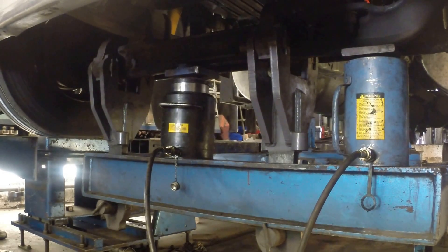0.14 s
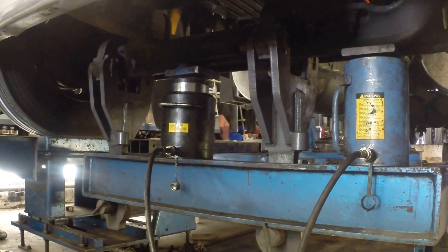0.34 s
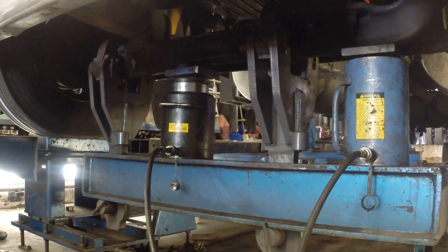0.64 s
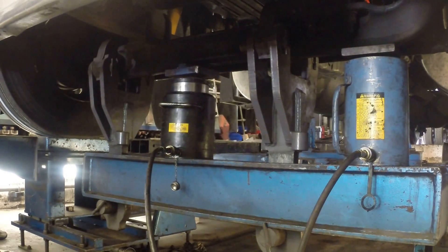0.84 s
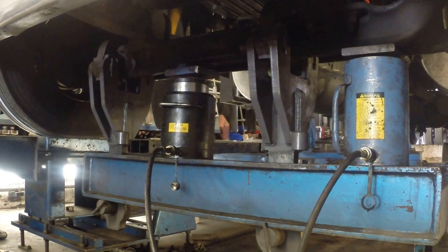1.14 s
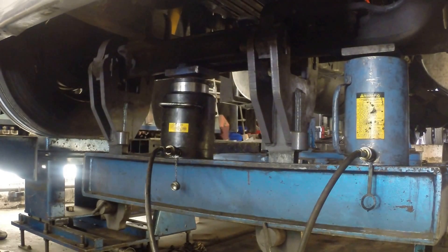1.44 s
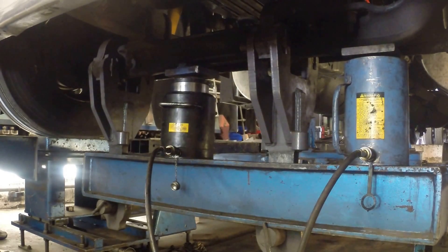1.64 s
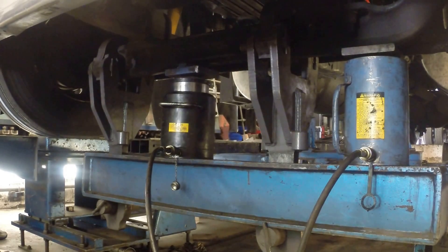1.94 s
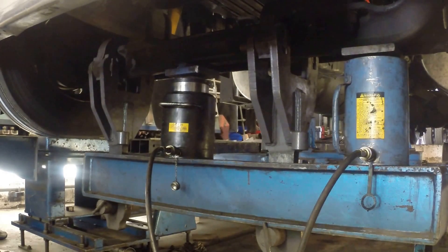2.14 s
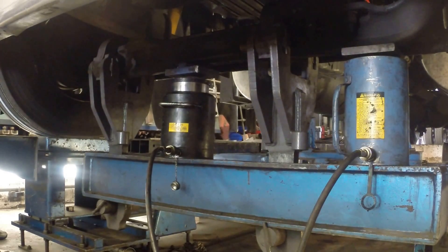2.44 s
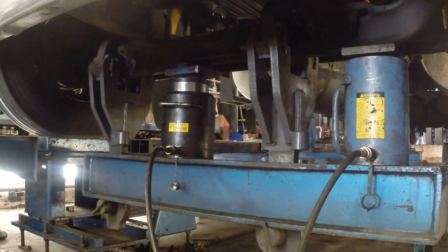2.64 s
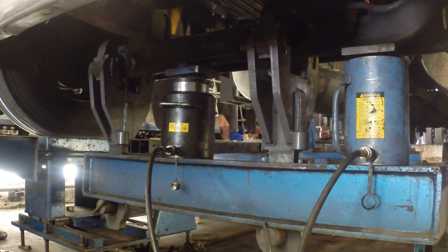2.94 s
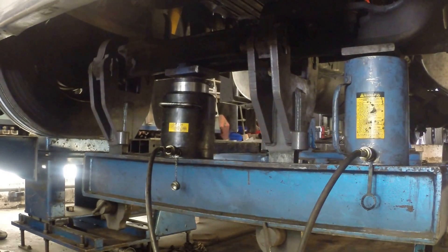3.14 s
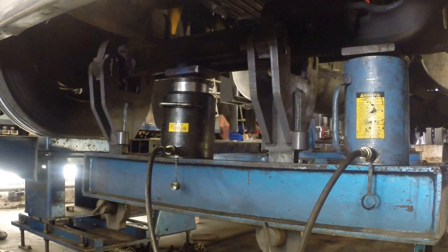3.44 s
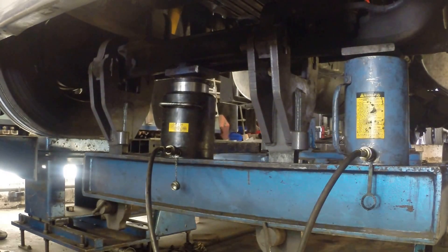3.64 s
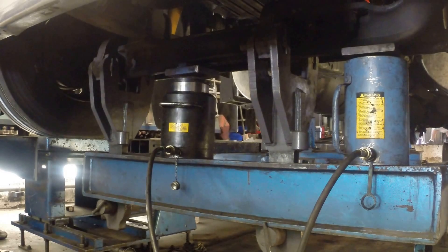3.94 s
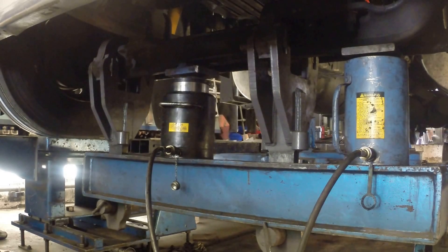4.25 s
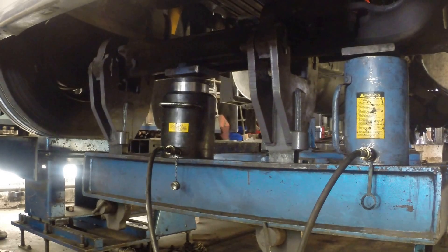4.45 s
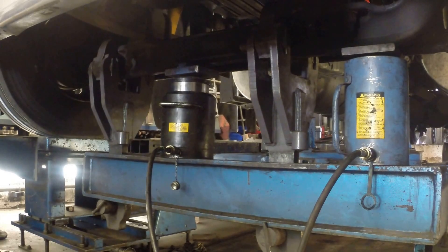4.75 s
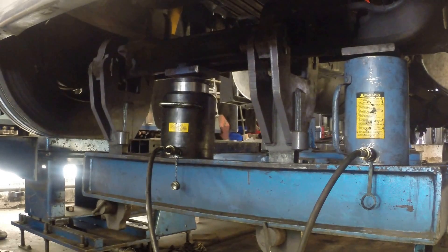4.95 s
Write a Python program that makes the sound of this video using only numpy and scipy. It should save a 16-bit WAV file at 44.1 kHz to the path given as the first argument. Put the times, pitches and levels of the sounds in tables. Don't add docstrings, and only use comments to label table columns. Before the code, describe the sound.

Shrill, rough hydraulic pump noise strains under load in an echoing hall, winds down abruptly, ticks faintly, and gives way to quiet shop hum.

```python
import sys
import numpy as np
from scipy import signal
from scipy.fft import rfft, irfft
from scipy.io import wavfile

SR = 44100
rng = np.random.default_rng(int(sys.argv[2]) if len(sys.argv) > 2 else 0)


def pcm_store(signal):
    levels = np.round(np.clip(np.atleast_2d(signal), -1, 1) * 32767)
    wavfile.write(sys.argv[1], SR, levels.astype(np.int16).T)


def attenuation_scalar(level_db):
    decades = np.asarray(level_db, float) / 20
    return 10 ** decades


N = 224406

SWITCH_OFF_S = 2.32
STROKES_PER_TURN = 1.62

# start_s, speed_turns_per_s
SPEED = [
    (0, 160.3),
    (.5, 158.64),
    (1, 156.9),
    (1.5, 155.08),
    (2, 153.65),
    (2.32, 152.4),
]
LOADED_SPEED = SPEED[-1][1]


def shaft():
    braking, easing = 520, 200
    coasted_s = np.clip(np.arange(N) / SR - SWITCH_OFF_S, 0, None)
    lost = braking * coasted_s - easing * np.minimum(coasted_s, .5) ** 2
    return np.maximum(in_time(SPEED)[0] - lost, 0)


# multiple of shaft speed, level_db (rms)
STRONG = [(12, -27.3), (16, -30.4), (20, -30.6), (30, -37), (40, -44)]
# multiple of shaft speed, level_db (rms)
WEAK = [(1, -51), (2, -58.5), (3, -34.5), (4, -43), (10, -38), (18, -72), (19, -49), (22, -46), (24, -45),
        (29, -57), (32, -49), (34, -57), (36, -44), (37, -64), (38, -55), (39, -60), (41, -70), (42, -50),
        (48, -57.5), (50, -56), (51, -56), (55, -59), (57, -58), (58, -80), (60, -62.5), (72, -69)]
# multiple of shaft speed, strokes added, level_db (rms)
SPLIT = [(12.47, 1, -45), (13.13, 0.94, -37.5), (19.5, -0.7, -49.5), (18.6, 0.93, -74), (31, 0.52, -62.5),
         (36.95, -0.63, -67.5), (41.9, -0.49, -56)]
MAINS_SIDE_DB = (-41.5, -35)


def powered_whine(turns, angle):
    t = np.arange(N) / SR
    out = np.zeros(N)
    for k, db in STRONG:
        k = round(k)
        out += attenuation_scalar(db + standing_db(k * turns)) * np.sin(k * angle)
    mains_pulse_hz = 120
    for side, db in zip((-1, 1), MAINS_SIDE_DB):
        out += attenuation_scalar(db + drift(1.1)) * np.sin(16 * angle + side * 2 * np.pi * mains_pulse_hz * t)
    split = [(k + strokes * STROKES_PER_TURN, db) for k, strokes, db in SPLIT]
    for k, db in WEAK + split:
        waver_db = .6 * np.log(k) * drift(2.5)
        start_angle = rng.uniform(0, 2 * np.pi)
        out += attenuation_scalar(db + waver_db + standing_db(k * turns)) * np.sin(k * angle + start_angle)
    return out


# pitch_hz, width_hz, level_db
STANDING = [(313.5, 15, 22), (1524, 22, 8), (1564, 6, -8), (1829.5, 3, -12), (1865, 12, -3), (1897, 68, 9),
            (2546, 32, 7), (3066.4, 12, -9.5), (3071, 54, 12), (3175, 60, 3), (3138, 4, -8),
            (3152, 4.3, -20), (3181, 6.2, -20), (4696, 44, 3.6), (4733, 4, -15), (4794, 5, -15),
            (6142, 92, 11.4), (6208, 5, -13), (6336, 135, 13.7), (6380, 35, -11), (7640, 60, 9),
            (9240, 120, 7), (11100, 150, 7)]


def standing_db(hz):
    coarse = sum(db / (1 + (2 * (hz[::64] - centre_hz) / width_hz) ** 2)
                 for centre_hz, width_hz, db in STANDING)
    return np.interp(np.arange(N) / 64, np.arange(len(coarse)), coarse)


# multiple of shaft speed, level_db (rms)
COAST = [(10, -34), (12, -27.5), (14, -42), (16, -40), (18, -43), (20, -33.5), (24, -43), (30, -39),
         (32, -42), (36, -41), (40, -43), (50, -47)]
# pitch_hz, width_hz, level_db
PANELS = [(598, 18, 10.5), (900, 60, 12), (1160, 70, 6), (1520, 110, 5), (1760, 110, 5), (2290, 60, 11),
          (2800, 120, 10), (4100, 200, 5), (5000, 200, 6), (5500, 250, 6)]


def coasting_whine(turns, angle, powered):
    speed = turns / LOADED_SPEED
    tones = np.zeros(N)
    for k, db in COAST:
        tones += speed ** (k / 17) * attenuation_scalar(db + (k / 7) * drift(60)) * np.sin(k * angle)
    turning = np.clip((turns - 36) / 10, 0, 1)
    tones = tones * (1 - powered) * turning
    return .4 * tones + resonances(tones, PANELS)


def whine(turns):
    angle = 2 * np.pi * np.cumsum(turns) / SR
    powered = np.clip((SWITCH_OFF_S - np.arange(N) / SR) / .01 + 1.5, 0, 1)
    running = powered * powered_whine(turns, angle)
    return np.sqrt(2) * (running + coasting_whine(turns, angle, powered))


# pitch_hz, width_hz, level_db
CASING = [(597, 12, 2), (675, 20, 2), (725, 16, -1), (810, 24, 1), (863, 20, 1), (945, 50, 0),
          (1187, 50, -6), (466, 60, -14), (1050, 120, -6), (1527, 90, -10), (2180, 40, -10),
          (2300, 120, -10), (2850, 120, -18), (4700, 300, -22), (5400, 250, -24), (6300, 500, -22)]
# pitch_hz, level_db (per Hz)
RUMBLE = [(88, -42), (150, -19.5), (371, -10.5), (465, -7), (530, -7), (919, 2), (1400, -16.5), (1820, -78),
          (3080, -120)]
# pitch_hz, level_db (per Hz)
OIL = [(710, -38), (1200, 0.5), (1310, -6), (1650, -9), (2240, -8), (2520, -19), (3140, -8.5), (3840, -19),
       (4600, -16), (5620, -22.5), (6520, -14), (7170, -27), (9750, -38), (10800, -32.5), (15000, -80)]
# time_s, level_db
SHUDDERS = [
    (2.305, 2.5),
    (2.395, 1.5),
    (2.46, 1.3),
]


def roar(turns):
    casing_db, rumble_db, oil_db = -20, -4.5, -26.5
    shudder_s = 0.013
    t = np.arange(N) / SR
    speed = np.minimum(turns / LOADED_SPEED, 1)
    jolt_db = sum(db * np.exp(-((t - s) / shudder_s) ** 2) for s, db in SHUDDERS)
    strokes_per_s = turns * STROKES_PER_TURN * (1 + 0.0384 * drift(22.4))
    stroke = np.cos(2 * np.pi * np.cumsum(strokes_per_s) / SR)
    knock_db = 2.0 * stroke + 0.55 * drift(39) + 2.3 * drift(10.4)
    knocks = attenuation_scalar(knock_db) * rng.standard_normal(N)
    body = attenuation_scalar(-4.5) * rms_one(resonances(knocks, CASING))
    body = body + attenuation_scalar(rumble_db) * speed * coloured(RUMBLE)
    oil = attenuation_scalar(1.7 * stroke) * coloured(OIL)
    pump = attenuation_scalar(casing_db + jolt_db) * speed ** 0.9 * body + attenuation_scalar(oil_db) * speed ** 0.9 * oil
    duller = signal.sosfilt(signal.butter(2, 7000, fs=SR, output="sos"), pump)
    return speed ** 2 * pump + (1 - speed ** 2) * duller


# time_s, level_db (peak), pitch_hz
TICKS = [
    (2.6194, -47, 5330),
    (2.6708, -37, 5700),
    (2.7591, -39, 6530),
]


def valve():
    out = np.zeros(N)
    t = np.arange(SR // 20) / SR
    decay_db = -60 * t / .008
    for s, db, hz in TICKS:
        ring = attenuation_scalar(decay_db) * np.sin(2 * np.pi * hz * t)
        crack = resonate(rng.standard_normal(len(t)), 10500, 4000) * attenuation_scalar(-13 + decay_db)
        out[round(s * SR):][:len(t)] += attenuation_scalar(db) * (ring + crack)
    return out


# delay_s, level_db
WALLS = [
    (.045, -17),
    (.14, -15),
]


def wall_echoes(tones):
    echoes = np.zeros(N)
    for s, db in WALLS:
        echoes += attenuation_scalar(db) * np.pad(tones, (round(s * SR), 0), mode="reflect")[:N]
    return signal.sosfilt(signal.butter(2, 1500, "high", fs=SR, output="sos"), echoes)


# pitch_hz, fade_s
HALL_T60 = [(200, 1.83), (1000, 0.28), (4000, 1.28), (9000, 0.98), (14000, 0.32)]


def hall(x):
    t, tail = np.arange(SR) / SR, 0
    for hz in 90 * 2. ** np.arange(8):
        octave = signal.butter(2, [hz / 2 ** .5, hz * 2 ** .5], "band", fs=SR, output="sos")
        noise = signal.sosfilt(octave, rng.standard_normal(SR))
        tail = tail + noise * attenuation_scalar(-60 * t / at_hz(HALL_T60, hz))
    return signal.fftconvolve(x, tail / np.sqrt(np.sum(tail ** 2)))[:N]


# pitch_hz, level_db (per Hz)
SHOP = [(12, -48.5), (20, -25), (32, -10), (69, -4), (128, -5.5), (170, -16), (216, -4.5), (296, -13),
        (331, -8.5), (391, -12), (430, -13.5), (647, -12), (1050, -8), (1700, -26), (2210, -45),
        (3740, -120)]
# pitch_hz, level_db (per Hz)
AIR = [(880, -28), (1500, -21), (1830, -0.5), (2120, -1), (2730, -6.5), (3410, -3), (6090, -15.5),
       (8140, -17), (10800, -31), (14000, -38)]


def shop():
    hum = attenuation_scalar(-36.5 + 0.18 * drift(0.53)) * coloured(SHOP)
    return hum + attenuation_scalar(-52) * coloured(AIR)


def insects():
    pitch_hz, width_hz, level_db = 8000, 1500, -72
    throbs_per_s, throb_start_s = 7.8, 0.044
    throb = np.cos(2 * np.pi * throbs_per_s * (np.arange(N) / SR - throb_start_s))
    chorus = resonate(rng.standard_normal(N), pitch_hz, width_hz)
    chorus = resonate(chorus, pitch_hz, width_hz)
    return attenuation_scalar(level_db + 7.0 * throb) * rms_one(chorus)


def rms_one(x):
    return x / np.sqrt(np.mean(x ** 2) + 1e-20)


def in_time(rows):
    s, *columns = np.transpose(rows)
    return [np.interp(np.arange(N) / SR, s, c) for c in columns]


def at_hz(points, hz):
    point_hz, value = np.transpose(points)
    return np.interp(np.log(hz), np.log(point_hz), value)


def drift(rate_hz):
    r = np.exp(-80 * np.pi * rate_hz / SR)
    slow = signal.lfilter([1], [1, -2 * r, r * r], rng.standard_normal(N // 40 + 2002))
    slow = slow[2000:]
    return np.interp(np.arange(N) / 40, np.arange(len(slow)), rms_one(slow))


def resonate(x, hz, width_hz):
    r = np.exp(-np.pi * width_hz / SR)
    feedback = [1, -2 * r * np.cos(2 * np.pi * hz / SR), r * r]
    return signal.lfilter(np.array([1, 0, -1]) * (1 - r * r) / 2, feedback, x)


def resonances(x, modes):
    return sum((-1) ** k * attenuation_scalar(db) * resonate(x, hz, width_hz)
               for k, (hz, width_hz, db) in enumerate(modes))


def coloured(spectrum):
    hz = np.maximum(np.fft.rfftfreq(N, 1 / SR), 1)
    return rms_one(irfft(rfft(rng.standard_normal(N)) * attenuation_scalar(at_hz(spectrum, hz)), N))


def scene():
    turns = shaft()
    tones = whine(turns)
    noise = roar(turns) + valve()
    reverberant = hall(attenuation_scalar(-19) * tones + attenuation_scalar(-8.5) * noise)
    mix = tones + noise + wall_echoes(tones) + reverberant + shop() + insects()
    return mix[None]


def roll_off(x):
    return signal.sosfilt(signal.butter(12, 15190, fs=SR, output="sos"), x)


def record(dry):
    return roll_off(dry)


dry = scene()
out = record(dry)
pcm_store(out)
```